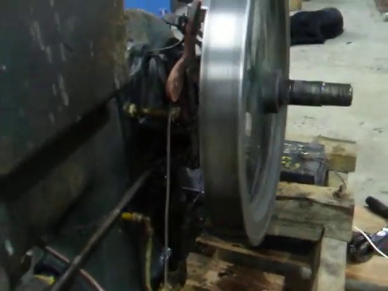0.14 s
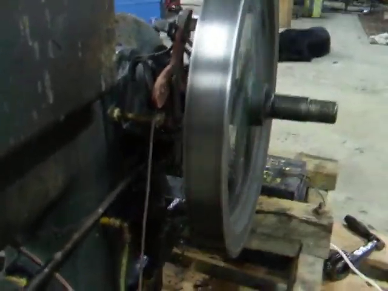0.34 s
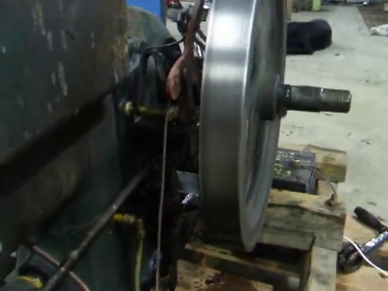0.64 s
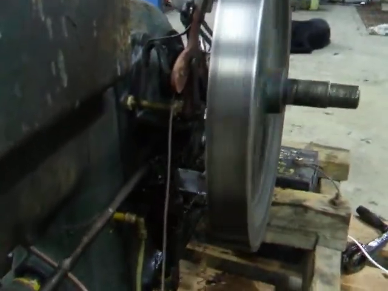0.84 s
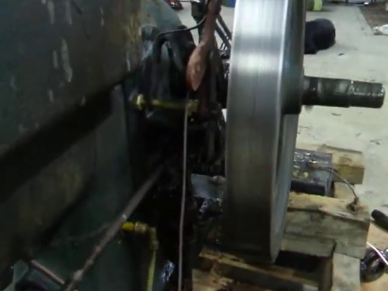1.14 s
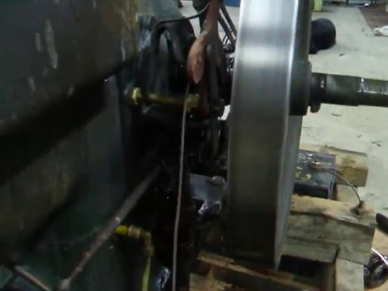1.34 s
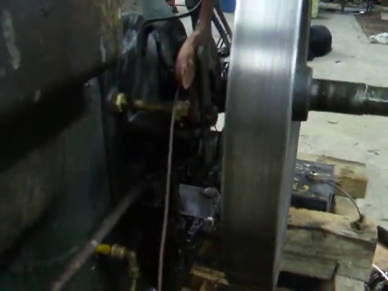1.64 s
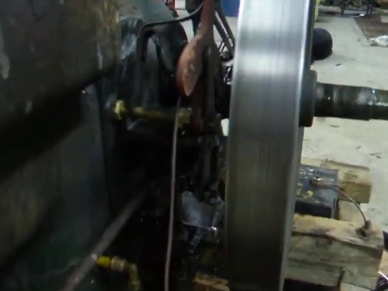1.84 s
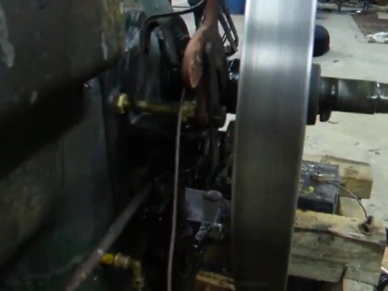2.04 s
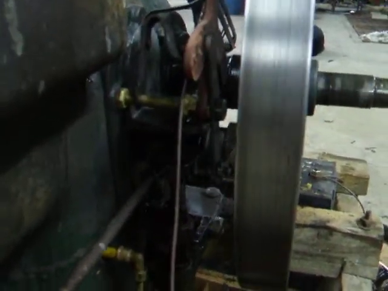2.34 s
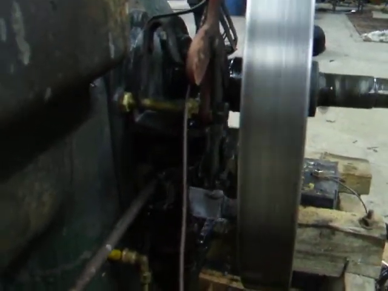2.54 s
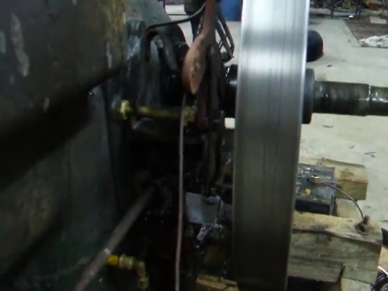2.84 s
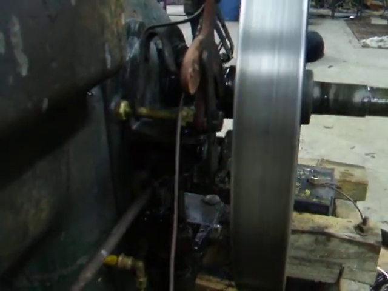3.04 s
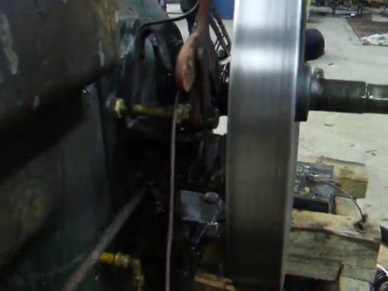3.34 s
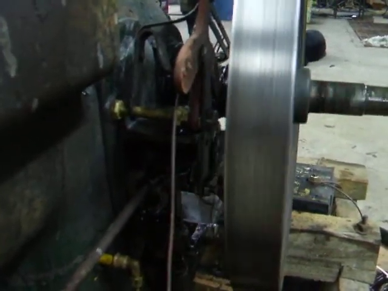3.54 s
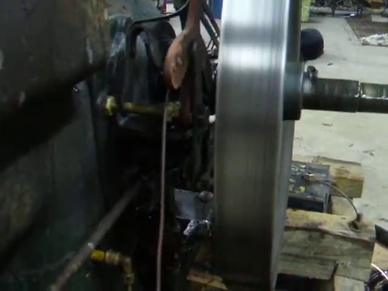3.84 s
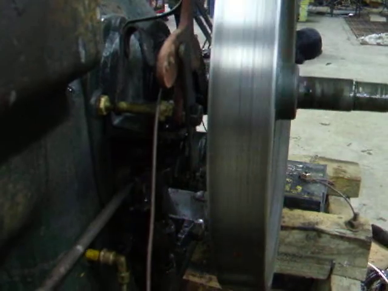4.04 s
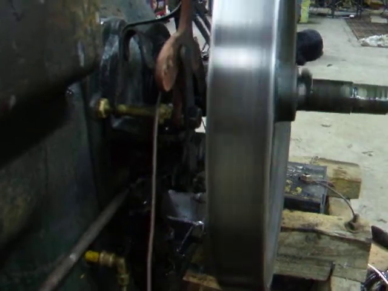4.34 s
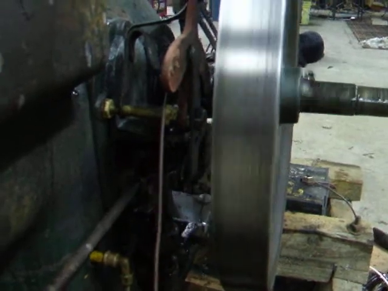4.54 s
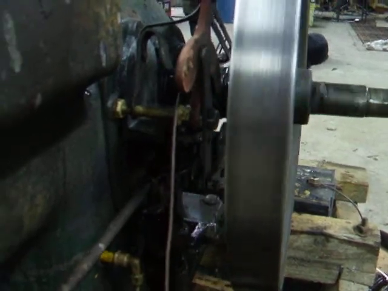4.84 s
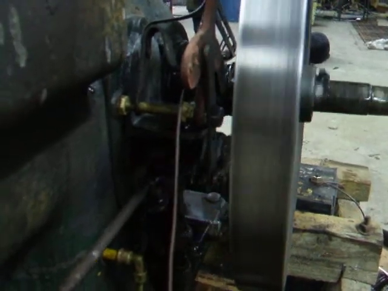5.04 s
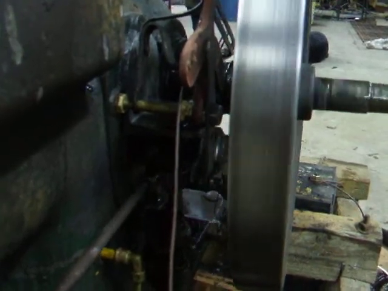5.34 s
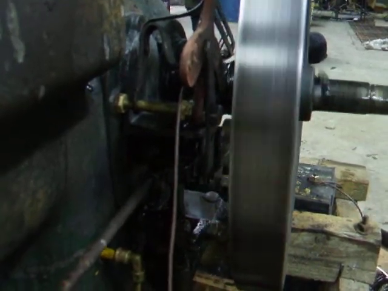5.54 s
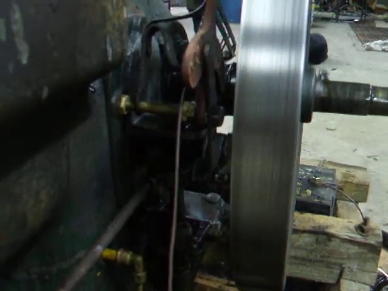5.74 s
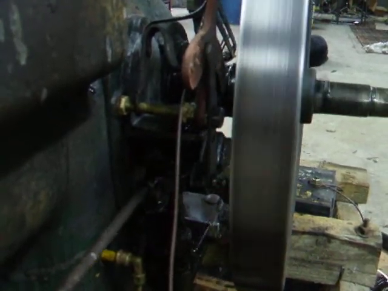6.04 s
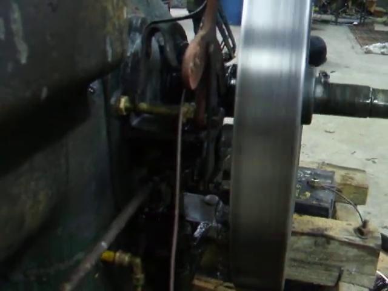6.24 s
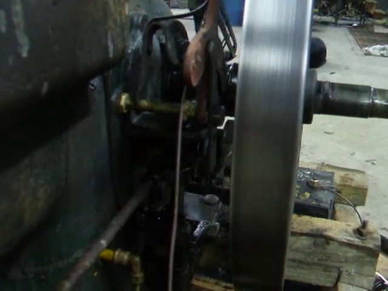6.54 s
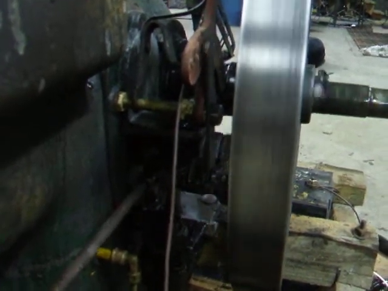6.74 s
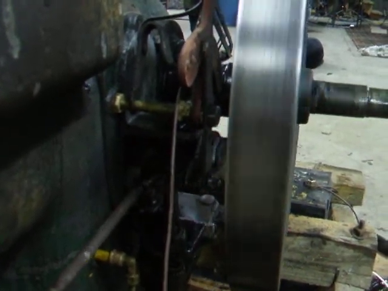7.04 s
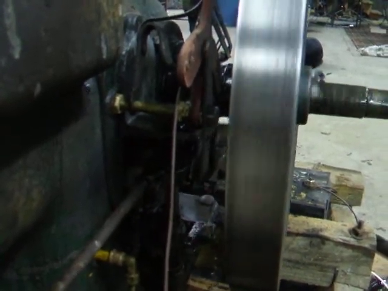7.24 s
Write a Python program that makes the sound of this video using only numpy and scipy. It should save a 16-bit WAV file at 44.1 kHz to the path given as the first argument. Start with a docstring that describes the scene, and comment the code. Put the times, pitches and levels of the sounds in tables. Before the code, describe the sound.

An old engine turns over steadily, its valve gear clicking and hissing between heavy knocks, over a low bearing rumble.

```python
"""A workshop, close to a small stationary engine turning over at about 175 rpm.
On each flywheel turn the valve gear latches and snaps, air hisses, the gears clack, and a run of dull
knocks shakes the cast-iron frame. A hollow double rub trails each turn, over the rumble of the bearings.
Metal contacts are bursts of tiny impacts, coloured by the part they strike; the dull knocks are
pressure pulses that set the frame ringing."""
import sys
import numpy as np
from scipy import signal
from scipy.fft import rfft, irfft
from scipy.io import wavfile
from scipy.ndimage import uniform_filter1d

SR = 44100
rng = np.random.default_rng(int(sys.argv[2]) if len(sys.argv) > 2 else 0)


def wav_record(signal):
    """Record a signal, one row per channel, as 16-bit PCM in the file named by sys.argv[1]."""
    frames = np.transpose(np.atleast_2d(signal))
    bounded = np.clip(frames, -1, 1)
    # unit amplitude maps onto the largest positive 16-bit level
    quanta = np.round(bounded * 32767).astype(np.int16)
    wavfile.write(sys.argv[1], SR, quanta)


N = 326340


def amp(db):
    """Turns dB into a gain."""
    return 10 ** (np.asarray(db) / 20)


def unit_rms(x):
    """Scales to rms 1."""
    return x / np.sqrt(np.mean(x ** 2) + 1e-20)


def curve_at(points, hz):
    """Reads a curve on a log-frequency axis."""
    point_hz, value = np.transpose(points)
    return np.interp(np.log(hz + 1), np.log(point_hz), value)


def add(mix, s, sound):
    """Mixes a sound in at s seconds; it may overhang either end."""
    start = round(s * SR)
    part = mix[max(start, 0):max(start + len(sound), 0)]
    part += sound[max(-start, 0):][:len(part)]


def through(x, response):
    """Plays x through an impulse response."""
    return signal.oaconvolve(x, response)[:N]


def ring(modes):
    """Impulse response of a set of decaying modes."""
    t = np.arange(SR // 3) / SR
    return sum(amp(db - 60 * t / t60) * np.cos(2 * np.pi * hz * t) for hz, db, t60 in modes)


def colour(spectrum, peaks, size=4096):
    """Impulse response of a struck part, with energy 1: resonant peaks on a broad spectrum."""
    hz = abs(np.fft.fftfreq(size, 1 / SR))
    peaks_db = sum(db / (1 + (2 * (hz - centre) / width) ** 2) for centre, width, db in peaks)
    log_gain = np.log(amp(curve_at(spectrum, hz) + peaks_db))
    minimum_phase = np.exp(np.conj(signal.hilbert(log_gain)))
    response = np.fft.ifft(minimum_phase).real[:size // 2]
    return response / np.linalg.norm(response)


def envelope(rise_s, decay_s):
    """A straight attack and an exponential decay, 0.2 s in all."""
    t = np.arange(SR // 5) / SR
    return np.minimum(t / rise_s, 1) * np.exp(-np.maximum(t - rise_s, 0) / decay_s)


def chatter(rise_s, decay_s, grain_db):
    """A burst of tiny impacts of uneven size; together they carry the energy of their envelope."""
    shape = envelope(rise_s, decay_s)
    grain = unit_rms(uniform_filter1d(rng.standard_normal(len(shape)), size=14))
    sizes = amp(grain_db * np.clip(grain, -2, 2))
    impacts = shape * sizes * rng.standard_normal(len(shape))
    return unit_rms(impacts) * np.sqrt(np.mean(shape ** 2))


# The workshop's short tail. Each row: frequency in Hz, seconds to die away by 60 dB.
ROOM_DECAY = [(100, .35), (500, .28), (2500, 0.23), (8000, 0.24)]


def reflections(predelay_s=.004, density=.06):
    """Sparse reflections; each band dies at its own speed."""
    size = SR // 2
    taps = rng.standard_normal(size) * (rng.random(size) < density)
    taps *= np.arange(size) > predelay_s * SR
    hz, t, bands = signal.stft(taps, SR, nperseg=256)
    fade = amp(-60 * t / curve_at(ROOM_DECAY, hz)[:, None])
    tail = signal.istft(bands * fade, SR, nperseg=256)[1]
    return tail / np.linalg.norm(tail)


def workshop(x, patterns=3):
    """Short workshop reverberation; several patterns of reflections crossfade to keep its tone smooth."""
    blend = np.linspace(0, patterns - 1, N)
    fades = (np.sqrt(np.maximum(1 - abs(blend - k), 0)) for k in range(patterns))
    return sum(through(x * fade, reflections()) for fade in fades)


# The bed of bearing noise. Each row: frequency in Hz, relative level in dB.
BEARING_SPECTRUM = [(24, -18), (45, 8), (80, 2), (135, 1), (200, -3), (270, -5), (420, -7), (600, -20),
                    (1700, -21), (2400, -15.5), (3200, -24), (5500, -24.5), (8000, -31.5)]


def bearings(db=-36.5):
    """Steady rumble and hiss of the turning shaft."""
    spectrum = amp(curve_at(BEARING_SPECTRUM, np.fft.rfftfreq(N, 1 / SR)))
    noise = irfft(rfft(rng.standard_normal(N)) * spectrum, N)
    return amp(db) * unit_rms(noise)


# The flywheel's tempo. Each row: time in seconds, speed in rpm.
FLYWHEEL_SPEED = [(0.26, 173.72), (0.69, 170.47), (2.06, 170.29), (2.68, 176.62), (3.16, 173.07),
                  (3.48, 177.56), (4.22, 175.22), (4.41, 170.82), (5.7, 177.79), (6.16, 177.28),
                  (7.23, 182.56)]
# The slow drift in the level of the blows. Each row: time in seconds, snap trim in dB, trim of the other blows
# in dB.
BLOW_LEVELS = [(0.16, 1, -1), (1.56, 1.2, -0.0), (2.61, -1.3, 0.75), (3.3, 0.8, -0.05), (3.9, -4, -0.35),
               (5.2, -2, -0.7), (6.7, -4.5, -0.84), (7.37, -2, -0.0)]


def turns(first_snap_s=.1599, usual_turn_s=.343, knock_turns=.31, knock_lag_s=.0338):
    """The crank sets the beat. Each row: snap and main knock in seconds, time stretch, both dB trims."""
    t = np.arange(-SR // 2, N + SR // 2) / SR
    turns_per_s = np.interp(t, *np.transpose(FLYWHEEL_SPEED)) / 60
    crank = np.cumsum(turns_per_s) / SR
    crank -= np.interp(first_snap_s, t, crank)
    whole_turns = np.arange(-1, np.interp(N / SR, t, crank))
    snap_s = np.interp(whole_turns, crank, t)
    knock_s = np.interp(whole_turns + knock_turns, crank, t) + knock_lag_s
    # Delays from the snap are crank angles, so a slow turn stretches them.
    stretch = 1 / (usual_turn_s * np.interp(snap_s, t, turns_per_s))
    trim_s, *trims_db = np.transpose(BLOW_LEVELS)
    snap_db, blows_db = (np.interp(snap_s, trim_s, db) for db in trims_db)
    return np.transpose([snap_s, knock_s, stretch, snap_db, blows_db])


# The two strokes of the rub. Each row: delay from the snap in seconds, average level in dB.
RUB_STROKES = [(.263, -38.5), (.287, -41.5)]


def hollow_rub(rise_s=.005, decay_s=.0084, slip_hz=400, slip_db=-17,
               swing_db=5.5, cycle_turns=2.177, loud_turn=.96):
    """A few regular slips among gritty ones make a rough rub, strong on roughly every other turn."""
    drive = np.zeros(N)
    shape = envelope(rise_s, decay_s)
    t = np.arange(len(shape)) / SR
    for turn, snap_s in enumerate(turns()[:, 0]):
        accent_db = swing_db * np.cos(2 * np.pi * (turn - loud_turn) / cycle_turns)
        for delay, db in RUB_STROKES:
            hz = slip_hz * (1 + .07 * rng.standard_normal())
            slips = amp(slip_db) * shape * np.sin(2 * np.pi * hz * t)
            grit = chatter(rise_s, decay_s, grain_db=3)
            add(drive, snap_s + delay, amp(db + accent_db) * (grit + slips))
    spectrum = [(60, -10), (135, .5), (250, -7), (450, -8), (750, -7), (2000, -19), (6000, -38)]
    return through(drive, colour(spectrum, peaks=[(405, 150, 14)]))


# Dull air pulses around the snap. Each row: delay in seconds at the usual speed, width in seconds,
# signed relative pressure, share sent to the frame.
SNAP_PULSES = [(0, 0.00096, -0.24, .01), (.0018, .0011, -0.02, 0), (0.015, 0.0063, .035, 0),
               (0.0226, 0.0021, -0.14, 0), (.046, 0.0048, -0.045, 0.024), (.0645, .002, .025, .1),
               (0.0772, 0.0023, -0.049, .1)]
# Pulses around the main knock; narrow ones give a blow its hard edge. Same columns, at any speed.
KNOCK_PULSES = [(-.018, .0012, 0.059, 0.4), (-0.0094, .0026, -0.13, 0.1), (0, 0.00082, .26, 0.11),
                (-.0002, .00013, 0.085, 0), (.0035, 0.00071, 0.11, -0.25), (0.0191, 0.00074, 0.24, .12),
                (.0188, 0.0002, 0.06, 0), (0.0238, .0018, 0.088, 0.4), (.0395, 0.0011, .1, 0.34),
                (.057, 0.00092, .11, 0.71)]
# The frame's low ring. Each row: pitch in Hz, relative level in dB, seconds to die away by 60 dB.
FRAME_MODES = [(271.5, 5.5, 0.12), (320, -8, 0.049), (51.4, -16, .33), (134.3, -23, 0.35),
               (402, -14.5, .05)]


def thumps(scatter_db=.4, spacing_scatter=.011, ring_db=-33, ring_scatter_db=1.1, low_cut_hz=27):
    """Soft, heavy blows push the air directly and set the frame ringing."""
    push, shake = np.zeros((2, N))
    t = np.arange(-SR // 50, SR // 50) / SR
    for snap_s, knock_s, stretch, _, blows_db in turns():
        frame_db = ring_scatter_db * rng.standard_normal()
        for s, pace, pulses in ((snap_s, stretch, SNAP_PULSES), (knock_s, 1, KNOCK_PULSES)):
            spacing = pace + spacing_scatter * rng.standard_normal()  # rebounds come early or late
            for delay, width, pressure, share in pulses:
                height = pressure * amp(blows_db + scatter_db * rng.standard_normal())
                pulse = height * np.exp(-(t / width) ** 2 / 2)
                start_s = s + delay * spacing + t[0]
                add(push, start_s, pulse)
                add(shake, start_s, share * amp(frame_db) * pulse)
    sound = push + amp(ring_db) * through(shake, ring(FRAME_MODES))
    return signal.sosfilt(signal.butter(1, low_cut_hz, "high", fs=SR, output="sos"), sound)


def crankcase(x, hz=385, width_hz=110, db=-9):
    """The hollow casting reinforces the low middle of every contact."""
    return amp(db) * signal.lfilter(*signal.iirpeak(hz, hz / width_hz, SR), x)


# The iron's bright ring. Each row: pitch in Hz, relative level in dB, seconds to die away by 60 dB.
IRON_MODES = [(2216, 1, .2), (2170, -5.5, 0.22), (2310, -4, 0.22), (2402, -2, .3), (1340, -5.5, .2),
              (2464, -5.5, .2), (2535, -5.5, 0.22), (3120, -8, .12), (5775, -7.5, 0.16)]


def iron_ring(x, db=-22.5):
    """The cast iron rings on after each contact."""
    response = ring(IRON_MODES)
    return amp(db) * through(x, response / np.linalg.norm(response))


# The tone of each part, as two lists. Each spectrum row: frequency in Hz, relative level in dB.
# Each resonance row: centre in Hz, width in Hz, boost or cut in dB.
PART_TONES = {"latch": ([(100, -27.5), (300, -8), (600, 1.5), (1000, -5.5), (1600, -3.5), (2400, -2.5),
              (3300, -2), (4400, -2), (5600, -2.5), (6700, -7.5), (7800, -3)], [(1240, 260, 7),
              (1570, 158, 8.5), (2073, 191, 5), (2606, 233, 12), (3110, 200, 10.5), (3940, 130, 4.5),
              (4910, 190, 13)]), "snap": ([(100, -35.5), (300, -5.5), (600, -16), (1000, -11), (1600, -10),
              (2400, -9.5), (3300, -5), (4400, -7), (5600, -5.5), (6700, -1), (7800, -5)], [(4727, 300, -2),
              (6546, 270, 1.5), (7570, 750, 6.5)]), "spring": ([(100, -26.5), (300, -16), (600, -1),
              (1000, -3), (1600, -1), (2400, 3), (3300, 0), (4400, 2), (5600, 0), (6700, -9), (7800, -8.5)],
              [(2560, 330, 5), (4027, 300, 4.5), (5260, 220, 2), (5800, 220, 2), (7000, 219, 6)]),
              "air": ([(100, -22), (300, -7.5), (600, -5.5), (1000, -4.5), (1600, -1.2), (2400, 0.5),
              (3300, -0.5), (4400, 2.5), (5600, 3.5), (6700, -5.5), (7800, -5.5)], [(2455, 300, -3.5),
              (5860, 87, 5.5), (7380, 183, 15)]), "gear": ([(100, -24), (300, -7), (600, -0.5), (1000, -4),
              (1600, -5.5), (2400, -0.2), (3300, -4.5), (4400, -7), (5600, -11), (6700, -7), (7800, -12.5)],
              [(721, 230, 5.5), (1210, 130, 8.5), (1540, 170, 7.5), (1992, 47, 9.5), (2060, 58, 2),
              (2193, 52, 6), (2486, 239, 5), (4000, 370, 6.5)]), "scrape": ([(100, -29.5), (300, -4),
              (600, -4.5), (1000, -0.5), (1600, -1.5), (2400, -5), (3300, 1.8), (4400, -4), (5600, -8.5),
              (6700, -1), (7800, -5)], [(3700, 250, 3), (6100, 160, 4)]), "knock": ([(100, -29.5),
              (300, -7.0), (600, -2.5), (1000, -5.5), (1600, -3.5), (2400, -13), (3300, -9), (4400, -16),
              (5600, -12), (6700, -8), (7800, -6)], [(825, 150, 9.5), (1276, 110, 6.5), (2080, 300, 10.5),
              (3070, 170, 8), (3920, 240, 12.5), (4900, 240, 14.5)]), "frame": ([(100, -26), (300, -1.5),
              (600, -2.5), (1000, -6), (1600, -6.5), (2400, -7.5), (3300, -7.5), (4400, -11), (5600, -7.5),
              (6700, -14), (7800, -12.5)], [(737, 100, 8), (1210, 62, 4), (1360, 37, 9), (1580, 100, 4.5),
              (2890, 79, 6), (3130, 290, 7.5), (3830, 160, 7), (4900, 290, 4)])}
# Contacts and hiss around the valve gear's snap. Each row: part, delay in seconds at the usual speed, # attack
# and decay in seconds, level before the slow level trim in dB, level scatter in dB.
SNAP_CONTACTS = [("gear", -.078, .01, 0.018, -49.5, 2), ("snap", -0.044, .004, 0.0041, -45, 3),
                 ("scrape", -.0179, .001, 0.0027, -26.5, .8), ("latch", -.0169, .002, 0.005, -21.8, .8),
                 ("knock", -0.0056, .001, 0.0024, -23, 1.1), ("snap", -.0021, .001, 0.003, -10.5, .7),
                 ("spring", .002, 0.0087, 0.0052, -22, 0.99), ("air", .036, .012, 0.073, -35, .6),
                 ("gear", .04, .025, .005, -38, 0.99), ("gear", .067, .0035, 0.01, -22.5, .6),
                 ("gear", .083, .008, 0.046, -32, .8)]
# The rattle around the main knock. Same columns, with delays that hold at any speed.
KNOCK_CONTACTS = [("air", -.038, .01, 0.018, -32, .8), ("gear", -.031, .005, .007, -30.5, 1),
                  ("scrape", -.015, 0.0047, 0.005, -20.5, .8), ("knock", -.0018, .0012, .0022, -17.5, .8),
                  ("frame", .007, 0.0034, 0.0051, -25.5, 1), ("knock", .0172, .0014, .003, -20, 1),
                  ("scrape", .026, 0.0028, 0.007, -27, 0.93), ("frame", 0.028, 0.0026, 0.011, -35, 1.5),
                  ("frame", .044, .003, 0.0079, -35, 1.6), ("frame", .0535, .0025, .011, -27, 0.9)]
# The pushrod takes up its play with a light tick and a bounce. Each row: lead on the snap in seconds,
# timing scatter in seconds, level in dB, level scatter in dB.
PUSHROD_TICKS = [(.0455, .0015, -26, 3.5), (.036, .003, -31.5, 0)]
# Now and then the pushrod lands hard. Each row: time in seconds, level in dB before the landing boost.
HARD_LANDINGS = [(1.513, -21), (2.9075, -19), (4.2708, -18.5), (5.9882, -22.5), (6.6584, -20.5),
                 (7.3248, -23.5)]


def clatter(metal_grain_db=3, air_grain_db=.8, jitter_s=.0003,
            tick_rise_s=.0002, tick_decay_s=.00051, landing_boost_db=3):
    """Every contact of every turn excites its own part of the engine; smoother bursts hiss as air."""
    drive = {part: np.zeros(N) for part in PART_TONES}
    for snap_s, knock_s, stretch, snap_db, blows_db in turns():
        for s, pace, contacts in ((snap_s, stretch, SNAP_CONTACTS), (knock_s, 1, KNOCK_CONTACTS)):
            for part, delay, rise_s, decay_s, db, scatter_db in contacts:
                late, harder = rng.standard_normal(2)
                level_db = db + scatter_db * harder + (snap_db if part == "snap" else blows_db)
                burst = chatter(rise_s, decay_s, air_grain_db if part == "air" else metal_grain_db)
                add(drive[part], s + delay * pace + jitter_s * late, amp(level_db) * burst)
        for lead, scatter_s, db, scatter_db in PUSHROD_TICKS:
            late, harder = rng.standard_normal(2)
            tick = amp(db + scatter_db * harder) * chatter(tick_rise_s, tick_decay_s, grain_db=0)
            add(drive["scrape"], snap_s - lead + scatter_s * late, tick)
    for s, db in HARD_LANDINGS:
        tick = amp(db + landing_boost_db) * chatter(tick_rise_s, tick_decay_s, grain_db=0)
        add(drive["scrape"], s - 2 * tick_rise_s, tick)
    return sum(through(drive[part], colour(*tone)) for part, tone in PART_TONES.items())


def scene(metal_send_db=-13, thump_send_db=-16):
    """Ringing clatter, rub and thumps feed the room, over a dry bed of bearing noise; mono."""
    contacts, low = clatter(), thumps()
    metal = contacts + crankcase(contacts) + iron_ring(contacts) + hollow_rub()
    room = workshop(amp(metal_send_db) * metal + amp(thump_send_db) * low)
    return (metal + low + room + bearings())[None]


def record(dry, ceiling=.55, knee=5, high_cut_hz=8270):
    """Soft clipping rounds off the hardest snaps; a steep low-pass then takes off the top."""
    rounded = dry / (1 + abs(dry / ceiling) ** knee) ** (1 / knee)
    low_pass = signal.firwin(101, high_cut_hz, window=("kaiser", 7), fs=SR)
    return signal.oaconvolve(rounded, low_pass[None], "same")


dry = scene()
out = record(dry)
wav_record(out)
```